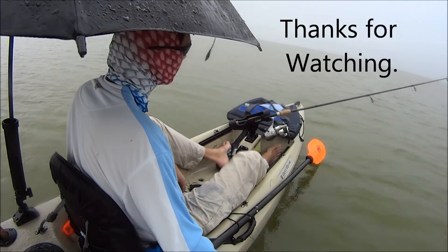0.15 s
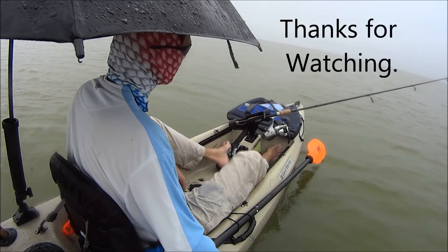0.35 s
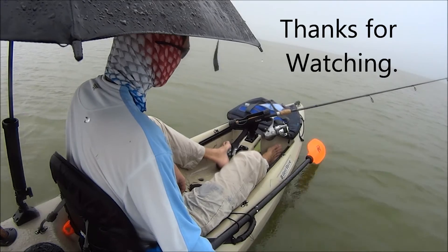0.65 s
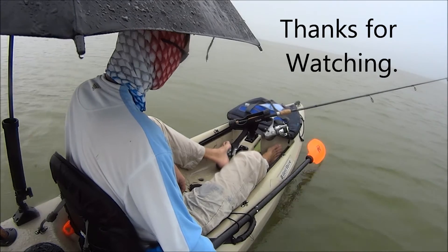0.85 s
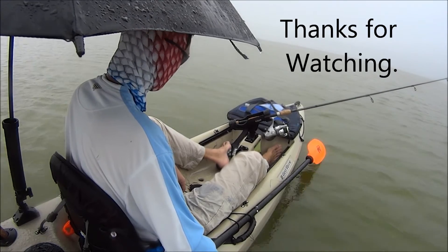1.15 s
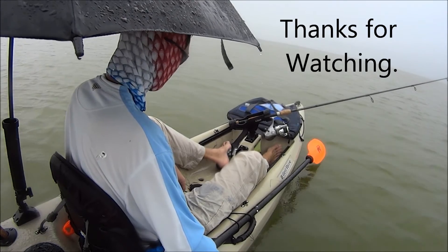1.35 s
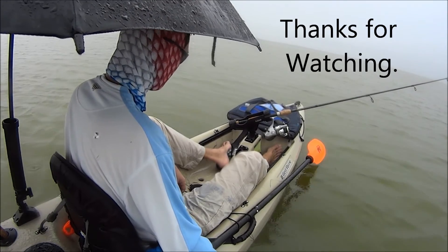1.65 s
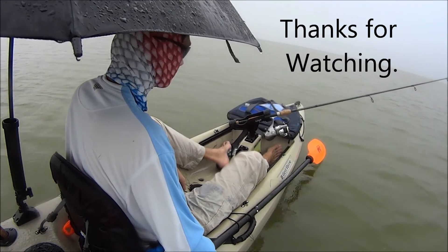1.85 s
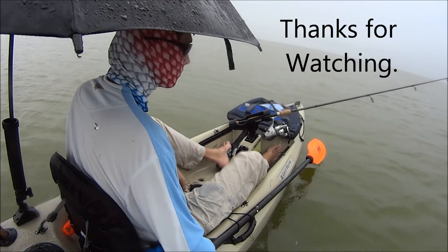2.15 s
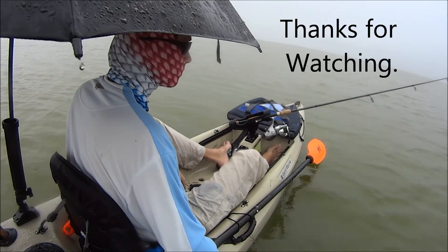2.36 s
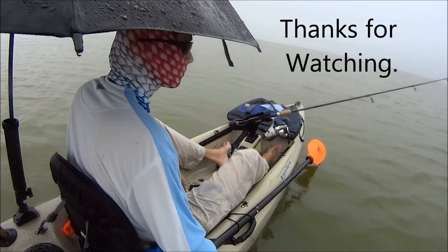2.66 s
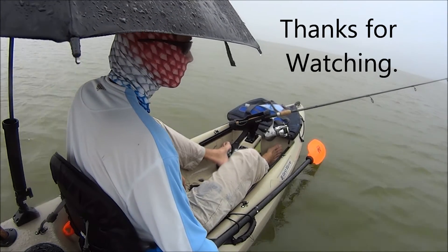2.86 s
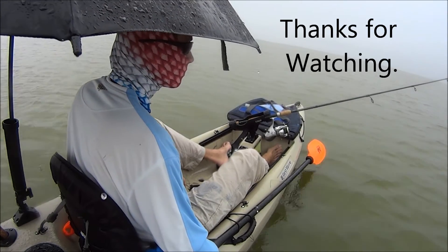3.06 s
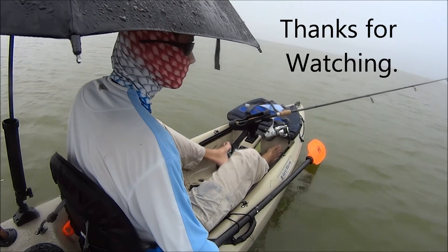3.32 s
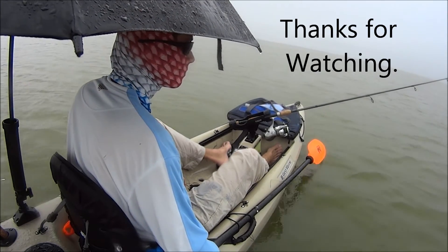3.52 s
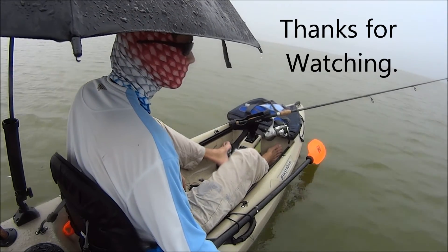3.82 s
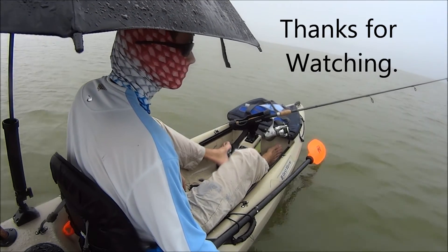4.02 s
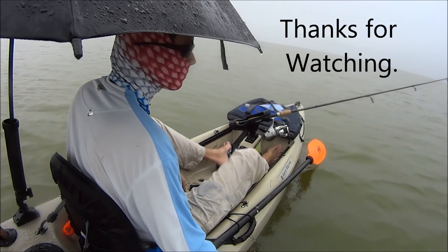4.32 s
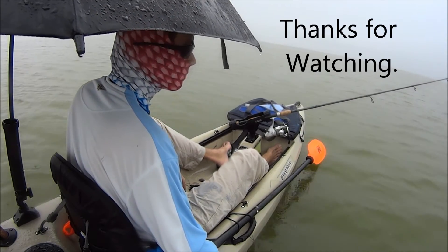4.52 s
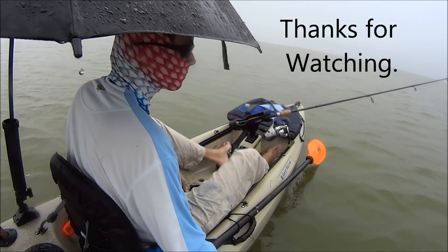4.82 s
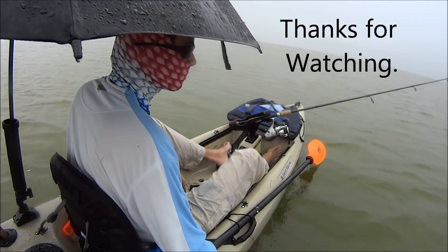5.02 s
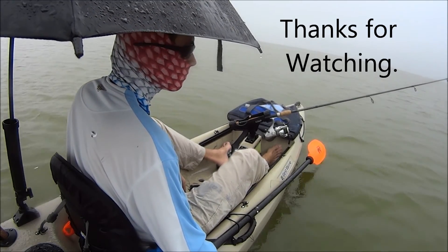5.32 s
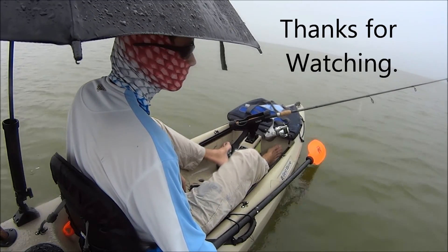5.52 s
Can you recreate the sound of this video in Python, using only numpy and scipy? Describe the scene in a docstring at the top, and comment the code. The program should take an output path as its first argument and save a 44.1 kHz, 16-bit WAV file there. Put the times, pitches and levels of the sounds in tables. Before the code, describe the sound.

Light rain ticks and snaps unevenly on a taut umbrella, while open water hisses softly and a small boat's hull gently rumbles.

```python
"""Light rain on an umbrella over a kayak, out on open water, the microphone just beside the canopy.
Each drop knocks on the taut cloth, snaps as it bursts and leaves the panel ringing briefly.
Farther off, fine rain hisses on the water all round and a few trapped bubbles plink.
From below, about once a second, a swell rumbles softly against the hull."""
import sys
import numpy as np
from scipy import signal
from scipy.fft import rfft, irfft, next_fast_len
from scipy.io import wavfile

SR = 44100
rng = np.random.default_rng(int(sys.argv[2]) if len(sys.argv) > 2 else 0)


def put_to_file(sound):
    """Save the sound as 16-bit audio at rate SR, in the file named by the first command-line argument."""
    columns = np.atleast_2d(sound).T  # one column per channel
    safe = np.clip(columns, -1, 1)
    whole_steps = np.round(safe * 32767)
    wavfile.write(sys.argv[1], SR, whole_steps.astype(np.int16))


N = 250469
GRAIN = np.arange(4096) / SR   # time axis of one short sound [s]

# Big drops on the canopy, close up; levels as if each part's energy fell within one millisecond:
# (time [s], knock [dB], knock pitch [Hz], knock Q, snap [dB], ring [dB], panel pitch [Hz],
#  left over right [dB])
CANOPY_DROPS = [(0.0851, -40, 1500, 2, -53, -52, 750, -6), (0.1529, -27.5, 2900, 2.5, -32, -40.5, 790, -1),
                (0.4945, -23, 1950, 1.5, -31.5, -42, 630, -7.5),
                (0.6175, -34.5, 1370, 0.74, -49, -47, 660, 0),
                (0.6771, -35.5, 2530, 1.5, -44.5, -47.5, 760, 3), (0.7902, -31, 3900, 9, -60, -52, 790, -4),
                (0.8473, -23, 1870, 0.74, -37, -39.5, 790, -4.5),
                (0.962, -29, 1450, 0.33, -32, -45, 660, 4), (1.0357, -20.5, 1190, 1.9, -43, -39, 660, -5.5),
                (1.1765, -36.5, 1960, 1.1, -40.5, -38, 743, -6),
                (1.2055, -20.5, 1380, 1.46, -31.5, -33, 682, -3),
                (1.4959, -29.5, 2860, 4.1, -36, -58, 685, 6),
                (1.5838, -30.5, 1680, 1.1, -30, -46.5, 680, -6),
                (1.8, -22.5, 2010, 0.61, -32.5, -38.5, 664, -10.5),
                (1.9291, -9, 2140, 0.92, -19, -27.5, 664, 1), (2.1138, -39, 1680, 0.55, -47, -56, 675, -2),
                (2.1681, -26, 1330, 1.2, -40.5, -57, 735, -2),
                (2.18, -16.5, 1810, 2.5, -28.5, -21, 713, -5.5),
                (2.5896, -35.5, 1490, 1.8, -53, -62, 620, -4), (2.627, -24, 1120, 2, -53, -33.5, 797, -7),
                (2.7605, -36.5, 1500, 0.82, -30, -53, 700, -8),
                (2.875, -39.5, 2410, 0.61, -38, -57, 790, 2), (3.3481, -40, 1580, 1.4, -40, -44, 710, -4),
                (3.494, -20.5, 1720, 1.4, -26.5, -29.5, 780, -2),
                (3.6212, -24, 1290, 0.5, -32.5, -57, 626, -6), (3.773, -30, 2350, 1.5, -44, -40, 795, -5),
                (3.8086, -42.5, 1030, 2.5, -39, -58, 810, -6), (4.005, -39.5, 1550, 1.8, -58, -56, 720, -6),
                (4.207, -36, 1110, 0.39, -26.5, -44.5, 623, -11),
                (4.2315, -38.5, 1180, 0.97, -39, -60, 635, 2),
                (4.4277, -30.5, 1520, 0.99, -43, -48, 640, -2),
                (4.4541, -32, 1230, 0.72, -47, -41, 760, -6),
                (4.5031, -16.5, 2140, 2, -15.5, -31.5, 766, -6),
                (4.5155, -27.5, 1320, 0.58, -34.5, -32.5, 755, -6),
                (4.604, -38.5, 1780, 2.6, -37, -58, 650, -8), (4.6678, -28, 1600, 0.67, -27, -41, 730, -15),
                (4.6746, -16.5, 2060, 1.55, -25, -29, 740, -8),
                (4.7069, -30.5, 1410, 0.95, -39.5, -45, 654, -4),
                (4.827, -35.5, 2300, 1.5, -42.5, -52, 730, 6),
                (4.8597, -38.5, 1390, 1.7, -47, -48, 705, -7),
                (4.9489, -17.5, 1230, 1.85, -45, -35, 772, -6.5),
                (4.9976, -32.5, 1510, 0.63, -48, -56, 637, -5),
                (5.0639, -27.5, 1660, 0.83, -31, -32.5, 758, -8),
                (5.3846, -33, 3390, 1.7, -56, -45, 840, -14),
                (5.4318, -11, 2750, 1.32, -18.5, -24, 730, -2.5),
                (5.4836, -24.5, 1700, 0.49, -32, -40, 634, -8),
                (5.532, -22, 1560, 2.5, -31, -35.5, 780, -16),
                (5.552, -22.5, 1100, 0.6, -37, -62, 630, -1.5), (5.5615, -34, 2220, 1.2, -39, -48, 640, -8),
                (5.6, -27.5, 1770, 0.93, -26.5, -37, 750, -9), (5.645, -38, 2550, 2.6, -33, -48, 825, 2)]
def heavy_drops():
    """Big drops land right beside the microphone, each on its own spot of the cloth."""
    out = np.zeros((2, N))
    for s, *stroke in CANOPY_DROPS:
        add(out, s, drop(*stroke))
    return out


def light_drops(per_s, softest_db, range_db, pitch_hz, q, snap_db, ring_db):
    """Faint droplets patter on the same canopy; wet spots sound brighter, dry ones more pitched."""
    out = np.zeros((2, N))
    for when, size, tension, wet, place in rng.random((int(per_s * N / SR), 5)):
        db = softest_db + range_db * size ** 2
        bright_db = db + 12 * (wet - .5)
        knock_hz, panel_hz = pitch_hz * 2 ** (2 * tension - 1), 640 + 170 * tension
        knock_q = q * 2 ** (1 - 2 * wet)
        tap = drop(db, knock_hz, knock_q, bright_db + snap_db, db + ring_db, panel_hz, 8 * place - 5)
        add(out, when * N / SR, tap)
    return out


SPRAY_DB = -26   # relative to the snap
RIB_ECHO_S, RIB_ECHO_DB = .0007, -13.5   # the nearest rib throws each blow back, hollowing its tone
KNOCK_LAG_S, TREBLE_LAG_S = .00009, .00022   # delay round the microphone housing to its far side
def drop(knock_db, pitch_hz, q, snap_db, ring_db, panel_hz, pan_db):
    """One drop close up: a damped knock pitched by the cloth's tension, a snap, spray and a ring."""
    push = disperse(impact(splash_db=-5.5, splash_t60=.012), hz=(1900, 3300), q=3.44)
    burst = disperse(impact(splash_db=-1, splash_t60=.009), hz=(4200, 5200, 7500), q=2.5)
    rib_s = RIB_ECHO_S * 2 ** rng.uniform(-.5, .5)
    push, burst = [x + from_db(RIB_ECHO_DB) * delayed(x, rib_s) for x in (push, burst)]
    cloth = signal.iirpeak(pitch_hz, max(q, .35), fs=SR)
    knock = from_db(knock_db) * unit(signal.lfilter(*cloth, signal.lfilter(*cloth, push)))
    snap = from_db(snap_db) * unit(band(burst, low_hz=3050, high_hz=6140))
    spray = from_db(snap_db + SPRAY_DB) * unit(band(burst, low_hz=7300, high_hz=9260))
    ring = from_db(ring_db) * panel_ring(panel_hz)
    # the knock leans to one side, the ring less so; the treble sits a little to the left
    body = knock * panned(pan_db) + ring * panned(pan_db / 3)
    treble = (snap + spray) * panned(pan_db / 4 + 4)
    pair = body + treble
    far_side = int(pan_db > 2)
    pair[far_side] = delayed(body[far_side], KNOCK_LAG_S) + delayed(treble[far_side], TREBLE_LAG_S)
    pair += shiver(knock + snap, early_db=-8.5, late_db=-27, late_t60=.1) * panned(pan_db / 2)
    return pair * np.sqrt(SR / 1000)   # unit energy becomes rms 1 over a millisecond


def impact(splash_db, splash_t60):
    """A sharp contact, then the irregular push of the drop spreading out."""
    fade = from_db(-60 * np.minimum(GRAIN / splash_t60, 4))
    splash = unit(rng.standard_normal(len(GRAIN)) * fade)
    return (GRAIN == 0) + from_db(splash_db) * splash


# Modes of one cloth panel: (frequency before tuning [Hz], relative level [dB], 60 dB decay [s])
PANEL_MODES = [(730, 15, 0.043), (1085, -8, 0.088), (1574, -5, 0.087), (2237, 10.5, 0.039),
               (686, -16, 0.21)]
def panel_ring(panel_hz):
    """The modes scale with the struck panel's tension; the spot decides how strongly each answers."""
    hz, db, t60 = np.transpose(PANEL_MODES)[:, :, None]
    strength_db = 2 * rng.standard_normal((len(PANEL_MODES), 1))
    fade = from_db(db + strength_db - 60 * GRAIN / t60)
    tuned_hz = panel_hz * hz / hz[0]
    return unit(np.sum(fade * np.sin(2 * np.pi * tuned_hz * GRAIN), axis=0))


# The cloth shivering after a knock: (frequency [Hz], relative level [dB])
SHIVER_SPECTRUM = [(200, 23), (500, 2.5), (900, 9.5), (2300, 1.5), (3500, 1), (7000, -16), (12000, 2.5)]
def shiver(knock, early_db, late_db, late_t60):
    """Waves run to the ribs and back, different in each channel; a faint part lingers."""
    early = from_db(early_db) * unit(from_db(-60 * GRAIN / .032))
    late = from_db(late_db) * unit(from_db(-60 * GRAIN / late_t60))
    onset = 1 - np.exp(-(GRAIN / .0016) ** 2)
    echoes = coloured(SHIVER_SPECTRUM, len(GRAIN)) * (early + late) * onset
    return signal.fftconvolve(echoes, knock[None], axes=1)[:, :len(GRAIN)]


# Rain on the open water round the boat: (frequency [Hz], relative level [dB])
HISS_SPECTRUM = [(120, -26.5), (220, -3.5), (400, -4.5), (1200, -5.5), (1600, -2.5), (1950, -9),
                 (2430, 1.5), (2850, -5), (3600, -10.5), (4800, -13), (6600, -13.5), (8000, -18.5),
                 (11000, -16.5), (12000, -114)]
def rain_on_water(start_db, rise_db_per_s, prickle_db, per_s):
    """Countless far splashes merge into a slowly growing hiss; nearer ones stand out as a prickle."""
    level_db = start_db + rise_db_per_s * np.arange(N) / SR
    splashes = (rng.random((2, N)) < per_s / SR) * rng.exponential(1, (2, N))
    prickle = band(splashes, low_hz=1880, high_hz=6560)
    return from_db(level_db) * (surround(HISS_SPECTRUM) + from_db(prickle_db) * prickle / prickle.std())


def plinks(per_s, softest_db, range_db, pitch_hz, cycles):
    """On the water to either side, a few drops trap a tiny bubble that pings and rises in pitch."""
    out = np.zeros((2, N))
    for when, size, strength, place in rng.random((int(per_s * N / SR), 4)):
        hz = pitch_hz * 2 ** (1.33 * (size - .5))
        fade = from_db(softest_db + range_db * strength ** 2 - 60 * GRAIN * hz / cycles)
        ping = np.sin(2 * np.pi * hz * GRAIN * (1 + 3 * GRAIN))
        add(out, when * N / SR, fade * ping * panned(12 * (place - .5)))
    return out


# The boat's deep heave and its hollow rumble, each: (frequency [Hz], relative level [dB])
HEAVE_SPECTRUM = [(18, -42), (29, -14), (37, 6), (45, -9), (60, -2), (75, -10.5), (100, -21.5), (160, -94)]
RUMBLE_SPECTRUM = [(55, -49), (90, -11.5), (120, -7), (135, -2.5), (149, -2.5), (172, -7.5), (205, -18.5),
                   (280, -24), (450, -62)]
# Swells against the hull: (time [s], length of push [s], heave [dB], rumble [dB])
HULL_SWELLS = [(0.0, 0.32, -51.5, -49.5), (0.25, 0.18, -45.5, -45.5), (0.97, 0.42, -46.5, -47.5),
               (2.01, 0.35, -48.5, -51), (3.22, 0.25, -55, -47), (3.86, .15, -55.5, -56.5),
               (4.48, 0.25, -46, -48)]
def hull_swells(calm_heave_db, calm_rumble_db, rumble_lag_s):
    """Below the microphone, swells heave the boat and the hollow hull answers; ripples fill the calm."""
    heave, rumble = from_db(calm_heave_db), from_db(calm_rumble_db)
    for s, length, heave_db, rumble_db in HULL_SWELLS:
        push = surge(s, length, release_db_per_s=106)
        answer = surge(s + rumble_lag_s, length, release_db_per_s=150)
        heave = np.hypot(heave, from_db(heave_db) * push)
        rumble = np.hypot(rumble, from_db(rumble_db) * answer)
    return heave * surround(HEAVE_SPECTRUM) + rumble * surround(RUMBLE_SPECTRUM)


def surge(start, length, release_db_per_s, attack_s=.059, sag_db_per_s=9):
    """The envelope of one swell: it builds up, eases while it pushes, then drains away."""
    age = np.maximum(np.arange(N) / SR - start, 0)
    fall_db = sag_db_per_s * age + release_db_per_s * np.maximum(age - length, 0)
    return np.minimum(age / attack_s, 1) ** 2 * from_db(-fall_db)


# A glug down at the waterline: (time [s], pitch [Hz], level [dB], 60 dB decay [s])
HULL_GLUGS = [(3.064, 308.5, -38.5, .11)]
def hull_glug():
    """A pocket of air glugs in a small slosh against the hull, right of the microphone."""
    out = np.zeros((2, N))
    for s, hz, db, t60 in HULL_GLUGS:
        fade = from_db(db - 60 * GRAIN / t60) * (1 - np.exp(-GRAIN / .01))
        slosh = band(rng.standard_normal(len(GRAIN)), low_hz=242, high_hz=423)
        glug = np.sin(2 * np.pi * hz * GRAIN) + .42 * slosh / slosh.std()
        add(out, s, fade * glug * panned(pan_db=-5))
    return out


# How alike the background's two channels are, opposed in the mids: (frequency [Hz], left-right correlation [-1
# to 1])
STEREO_LIKENESS = [(30, 0.99), (150, 0.96), (280, 0.18), (580, -0.63), (1240, -0.52), (2650, -0.046),
                   (5670, -0.0067), (12000, 0.76)]
# Their lean to one side: (frequency [Hz], left over right [dB])
STEREO_BALANCE = [(30, -1), (600, -0.4), (1150, -2.5), (2100, 0), (3700, 6), (6700, 0.5), (12000, 0.5)]
def surround(spectrum):
    """Noise from all round the microphone, nearly mono in the bass and wide in the middle; rms 1."""
    size = next_fast_len(N, True)
    mid, side = rfft(coloured(spectrum, size))
    hz = np.arange(len(mid)) * SR / size
    alike = np.clip(at_hz(STEREO_LIKENESS, hz), -1, 1)
    sign = np.array([[1], [-1]])
    pair = np.sqrt(1 + alike) * mid + sign * np.sqrt(1 - alike) * side
    lean = from_db(sign * at_hz(STEREO_BALANCE, hz) / 2)
    x = irfft(pair * lean, size)[:, :N]
    return x / x.std()


def coloured(spectrum, size):
    """Two unrelated noises with the given spectrum, rms 1."""
    gain = from_db(at_hz(spectrum, np.arange(size // 2 + 1) * SR / size))
    x = irfft(rfft(rng.standard_normal((2, size))) * gain, size)
    return x / x.std()


def at_hz(points, hz):
    """Read a curve on a log-frequency axis."""
    known, values = np.transpose(points)
    return np.interp(np.log(np.maximum(hz, 1)), np.log(known), values)


def disperse(x, hz, q):
    """All-passes delay each pitch by its own amount, which draws a click out into a few swings."""
    for centre in hz:
        x = x - 2 * signal.lfilter(*signal.iirpeak(centre, q, fs=SR), x + 1e-18)
    return x


def band(x, low_hz, high_hz):
    """A gentle band-pass."""
    return signal.sosfilt(signal.butter(2, [low_hz, high_hz], "band", fs=SR, output="sos"), x + 1e-18)


def delayed(x, s):
    """The same short sound, a little later."""
    return np.concatenate([np.zeros(round(s * SR)), x])[:len(x)]


def panned(pan_db):
    """Left and right gains with a mean power of one; positive is left."""
    return np.sqrt(2) * unit(from_db([[pan_db / 2], [-pan_db / 2]]))


def from_db(db):
    """Decibels to gain."""
    return 10 ** (np.asarray(db) / 20)


def unit(x):
    """Scale to an energy of one."""
    return x / np.sqrt(np.sum(x ** 2) + 1e-30)


def add(out, s, sound):
    """Mix a stereo sound in at a time."""
    start = max(int(s * SR), 0)
    room = out[:, start:start + sound.shape[1]]
    room += sound[:, :room.shape[1]]


def scene():
    """From the microphone: canopy close by, water all round, hull below."""
    patter = light_drops(per_s=38, softest_db=-48.5, range_db=4.5,
                         pitch_hz=1960, q=1.6, snap_db=-6, ring_db=-11)
    bubbles = plinks(per_s=4, softest_db=-52, range_db=12, pitch_hz=4800, cycles=45)
    canopy = heavy_drops() + patter
    water = rain_on_water(start_db=-53.5, rise_db_per_s=.34, prickle_db=-28, per_s=130) + bubbles
    hull = hull_swells(calm_heave_db=-67.5, calm_rumble_db=-66, rumble_lag_s=.013) + hull_glug()
    return canopy + water + hull


CUTOFF_HZ = 11300
def record(dry):
    """A steep low-pass cuts the top treble from the microphone's signal."""
    return signal.sosfilt(signal.ellip(10, .2, 75, CUTOFF_HZ, fs=SR, output="sos"), dry)


dry = scene()
out = record(dry)
put_to_file(out)
```